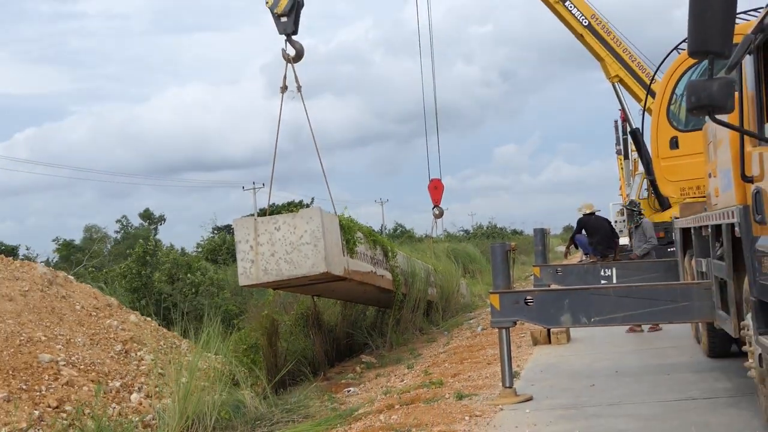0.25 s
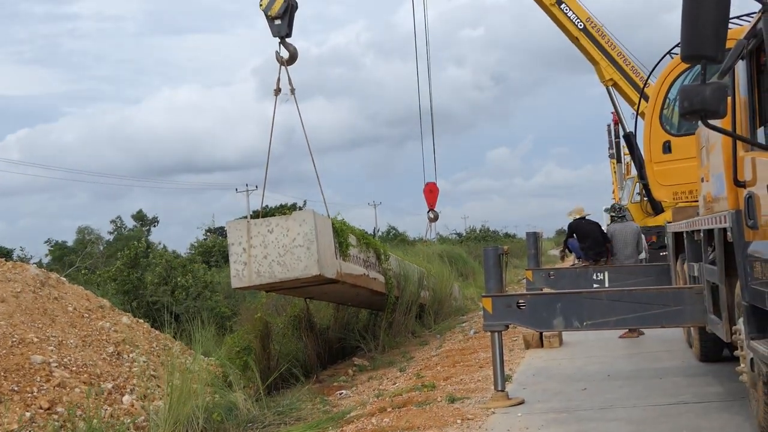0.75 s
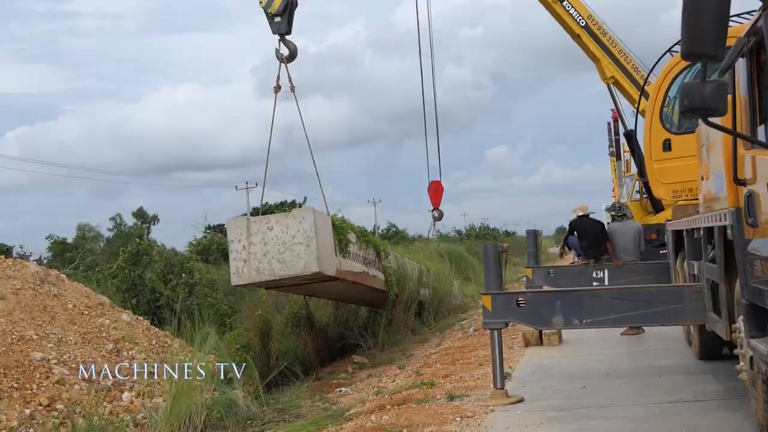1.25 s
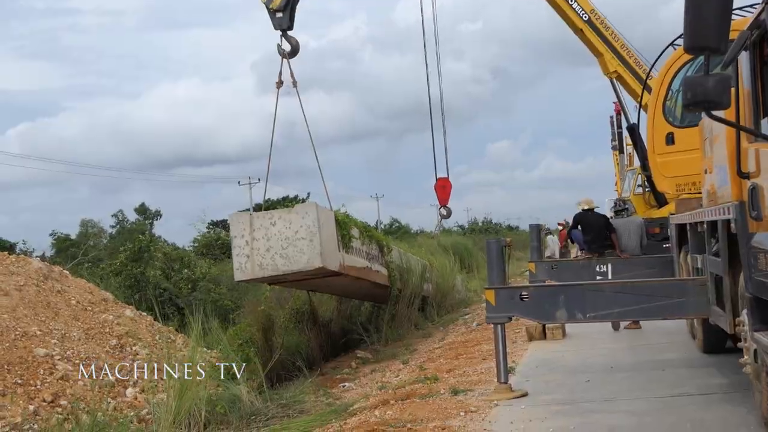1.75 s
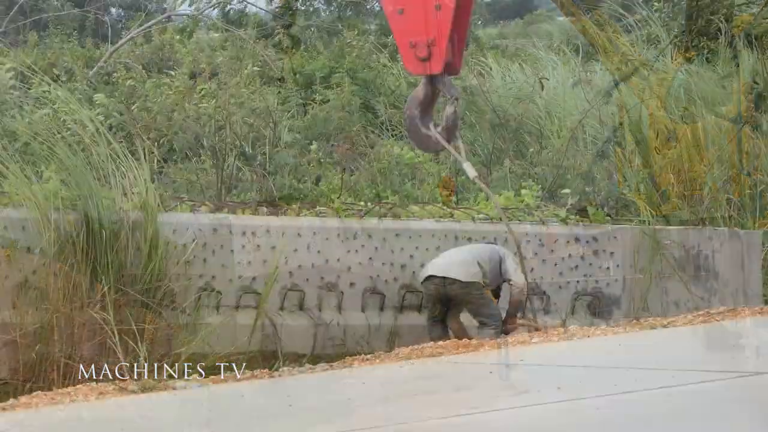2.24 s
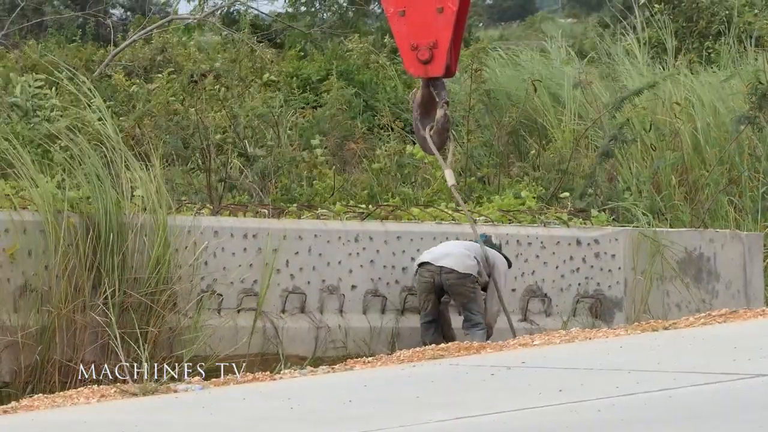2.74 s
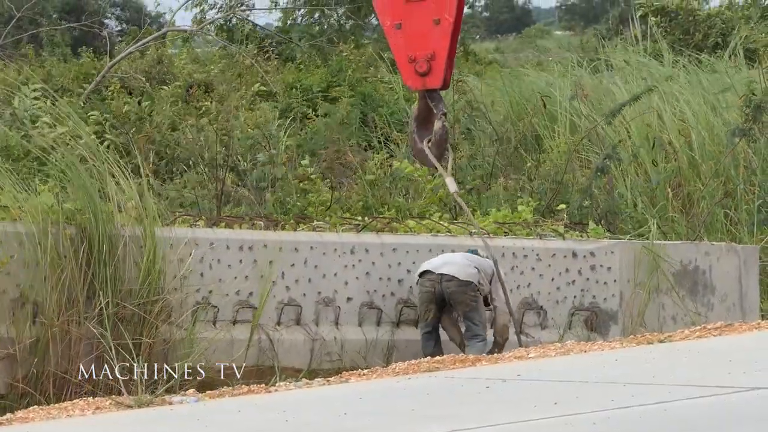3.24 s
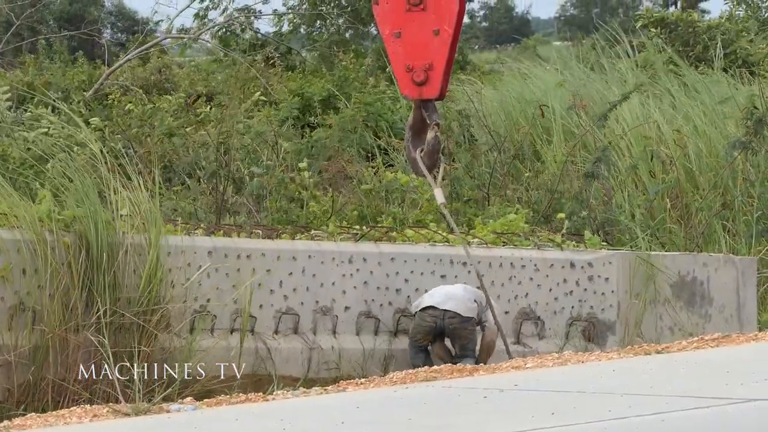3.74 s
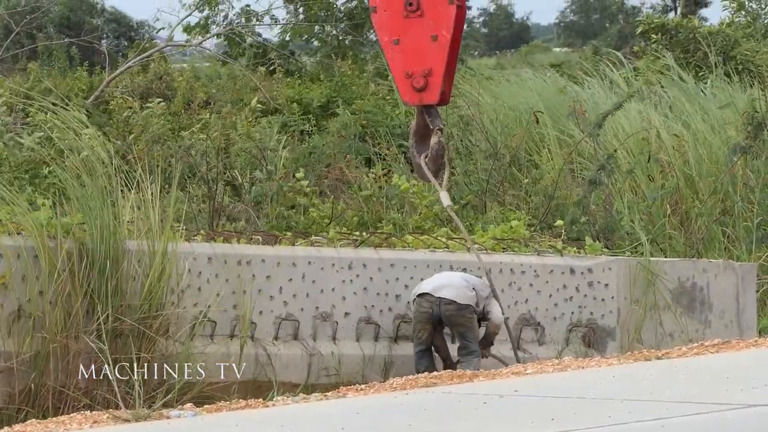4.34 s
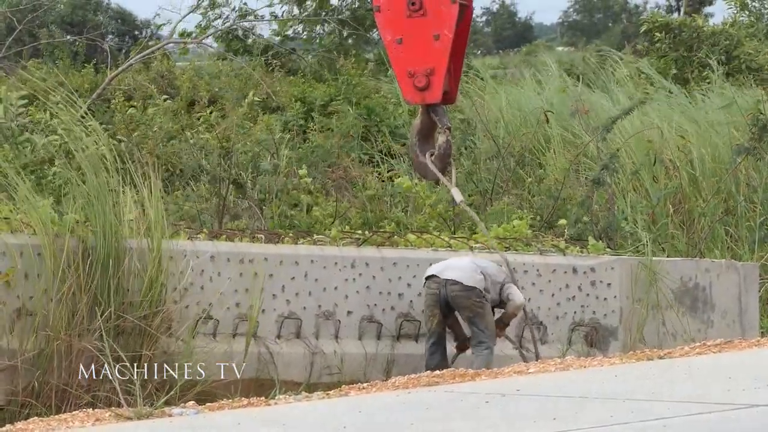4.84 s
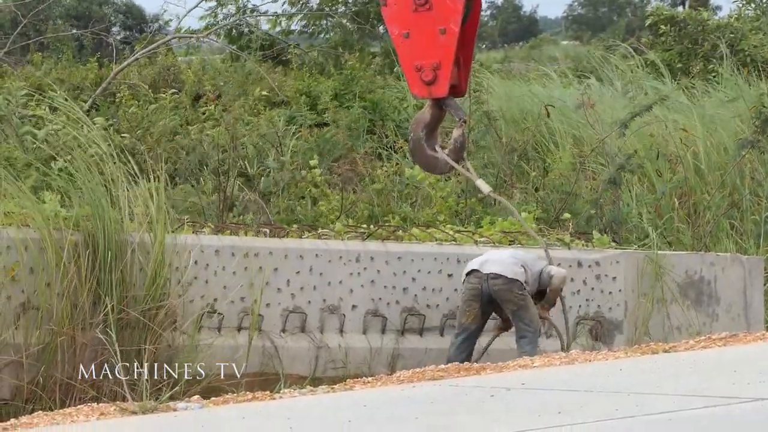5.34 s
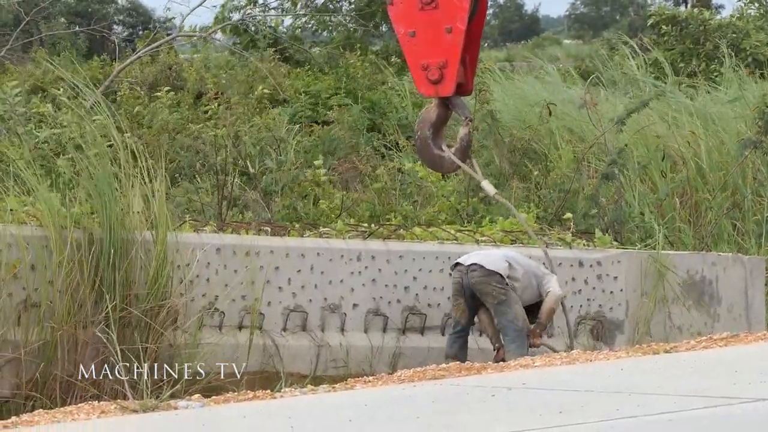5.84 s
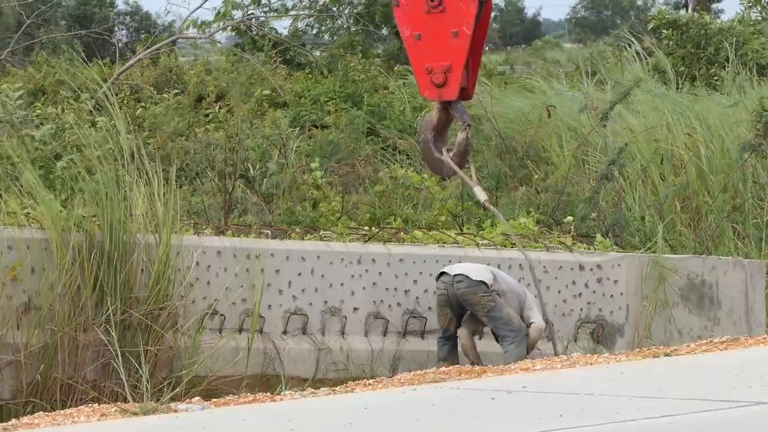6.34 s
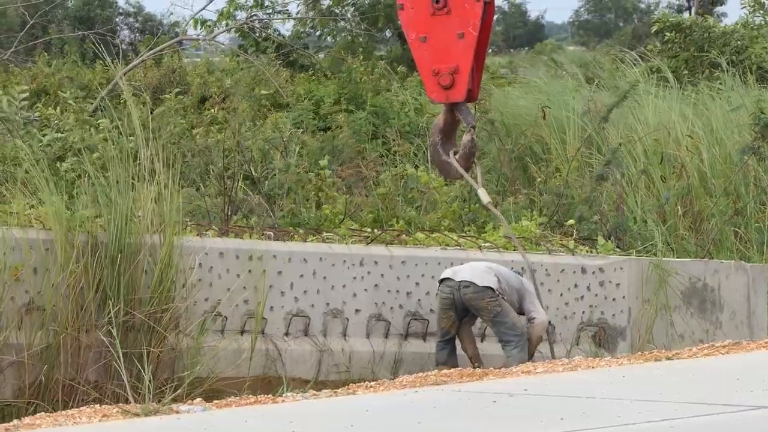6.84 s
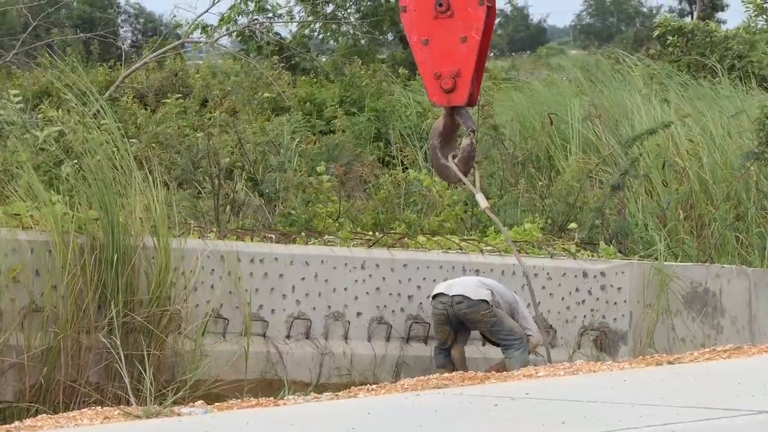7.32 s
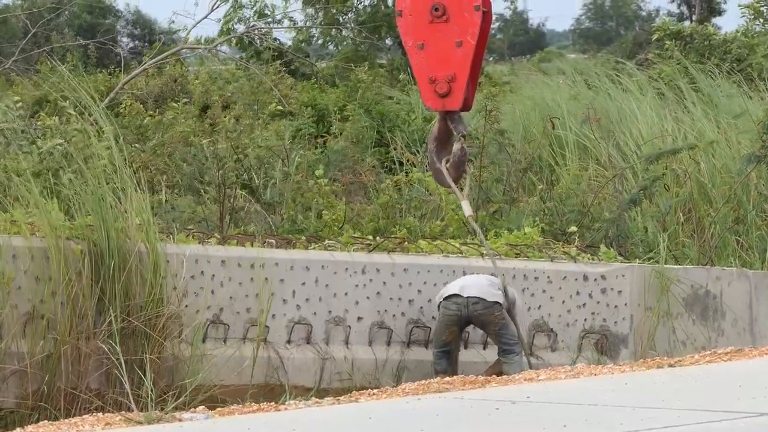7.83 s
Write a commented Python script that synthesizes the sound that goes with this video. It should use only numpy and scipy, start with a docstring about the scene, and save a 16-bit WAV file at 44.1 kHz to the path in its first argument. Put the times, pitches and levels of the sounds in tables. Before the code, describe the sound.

A loaded diesel crane engine roars and whines, cuts abruptly to brief silence, then a slower idling diesel knocks and hums while loose tackle clanks.

```python
"""A six-cylinder diesel crane truck roars at lifting speed, its hydraulic pump whining; after a short
silence, at a second place further off, an eight-cylinder idles with an uneven knock.
Engines are noise pulsed by firings, plus tones locked to the shaft; a hum of idling engines is wavering tones.
On the left loose tackle scrapes (bursts of noise) and clanks (ringing modes with cracks of noise).
Steel ticks and things bump as short ringing tones, and grit rustles as small bursts of grainy noise."""
import sys
import numpy as np
from scipy import signal
from scipy.fft import rfft, irfft, next_fast_len
from scipy.io import wavfile
from scipy.ndimage import map_coordinates

SR = 44100
rng = np.random.default_rng(int(sys.argv[2]) if len(sys.argv) > 2 else 0)


def master_out(mix):
    """Clip the mix to full scale and print it as 16-bit PCM to the path in sys.argv[1]."""
    frames = np.transpose(np.atleast_2d(mix))
    ceiling = np.clip(frames, -1, 1)
    pcm = np.round(ceiling * 32767).astype(np.int16)
    wavfile.write(sys.argv[1], SR, pcm)


N = 356328

LIFT_CYCLE_HZ, IDLE_CYCLE_HZ = 13.333, 4.11  # full four-stroke cycles a second
# knock of each lifting-engine cylinder, in firing order: level_db (relative)
LIFT_CYLINDERS = [3.5, -7, 3, -5.5, 0.5, 0.5]
# how far the second place's engines lean to the left: pitch_hz, left_minus_right_db
IDLE_LEAN = [(60, 0.5), (110, -0.5), (200, 0.0), (380, 2), (700, 3.5), (1290, 9), (2380, 7.5), (4400, 4),
             (8120, 2.5), (15000, -1.5)]
# how far the tackle leans to the left: pitch_hz, left_minus_right_db
TACKLE_LEAN = [(150, 4), (380, 0), (700, 14), (1300, 14), (2400, 14), (4400, 5), (9000, 3)]


def amp(db):
    """Decibels to gain."""
    return 10 ** (np.asarray(db) / 20)


def unit(x):
    """Scale to rms 1."""
    return x / np.sqrt(np.mean(x ** 2) + 1e-20)


def clock():
    """Time of every sample (s)."""
    return np.arange(N) / SR


def along(points, hz):
    """Read a curve of (Hz, value) points, spaced on a log pitch axis."""
    f, v = np.transpose(points)
    return np.interp(np.log(hz + 1), np.log(f + 1), v)


def wobble(rate):
    """A smooth curve through random points, rate of them a second."""
    points = rng.standard_normal(int(N * rate / SR) + 4)
    return map_coordinates(points, [clock() * rate])


def filtered(x, response):
    """Shape x by a gain for each frequency."""
    m = next_fast_len(N + 8192)
    gain = response(np.fft.rfftfreq(m, 1 / SR))
    return irfft(rfft(x, m) * gain, m)[..., :N]


def leaned(x, lean):
    """Share a sound between left and right, frequency by frequency."""
    def gains(hz):
        g = amp(np.outer([.5, -.5], along(lean, hz)))
        return g / g.mean(axis=0)
    return filtered(x, gains)


def placed(pair, spectrum, alike, lean):
    """Two unrelated signals become one coloured stereo source of rms 1."""
    def shape(hz):
        # the more alike left and right are, the less of the side signal is used
        turn = np.arccos(np.clip(along(alike, hz), -1, 1)) / 2
        return amp(along(spectrum, hz)) * [np.cos(turn), np.sin(turn)]
    mid, side = filtered(pair, shape)
    return unit(leaned(np.array([mid + side, mid - side]), lean))


def lifting_engine():
    """Six cylinders under load: a roaring body, dense injector clatter and the pump's whine."""
    # colour of the roar, then of the clatter: pitch_hz, level_db (relative)
    body_colour = [(25, -36.5), (70, -30.5), (110, -16.5), (155, -10), (300, -3.5), (490, 0.5), (600, -1),
                   (740, -0.5), (880, -9.5), (1000, -12.5), (1250, -19), (1800, -46.5), (4000, -95)]
    clatter_colour = [(710, -48), (1200, -16.5), (1410, -3.5), (1610, -0.5), (2320, -3), (3060, -11),
                      (4280, -5.5), (4870, -12), (6040, -8.5), (7100, -19), (8080, -13), (9000, -17.5),
                      (11900, -15.5), (13800, -18.5), (15800, -30.5)]
    # how alike left and right are: pitch_hz, coherence (0-1)
    alike = [(60, 0.56), (150, 0.86), (380, 0.9), (950, 0.9), (2380, 0.5), (5980, 0.7), (15000, 0.86)]
    # lean to the left: pitch_hz, left_minus_right_db
    lean = [(60, 2), (110, -2), (200, -0.5), (380, -0.5), (700, 0), (1290, -2.5), (2380, -6), (4400, -5.5),
            (8120, -3), (15000, 0)]
    cycles = crank(LIFT_CYCLE_HZ, start=0, drift=0.00031)
    beat = firings(cycles, LIFT_CYCLE_HZ, LIFT_CYLINDERS, rise=.0006, decay=0.0052, bed=1.0, scatter_db=2.2)
    body = beat * roar_swell() * rattle(cycles, LIFT_CYCLE_HZ, [(150, 0.13), (900, 0.17)])
    clatter_repeat = [(1500, 0.39), (4000, 0.56), (8000, 0.14), (12000, .04)]
    clatter = beat * rattle(cycles, LIFT_CYCLE_HZ, clatter_repeat)
    whine = tones(lifting_tones(), cycles / LIFT_CYCLE_HZ, waver_db=0.5, smear=0.17, rate=6.64)
    return (amp(-26.5) * placed(body, body_colour, alike, lean)
            + amp(-27.0) * placed(clatter, clatter_colour, alike, lean)
            + leaned(whine, lean))


def lifting_tones():
    """Pump, exhaust, gears and a belt-driven accessory follow the engine's speed: lines of (Hz, dB)."""
    # timing gears: rough pitch_hz, level_db; both are adjusted below
    meshes = [(1400, -49), (1599, -42.5), (1973, -47), (2239, -49), (2358, -44), (2880, -52), (3332, -49.5),
              (3682, -52.5), (3801, -56.5), (3957, -50.5), (4242, -47.5)]
    pump_hz = 36 * LIFT_CYCLE_HZ  # 36 pump strokes in each engine cycle
    firing_hz = len(LIFT_CYLINDERS) * LIFT_CYCLE_HZ
    pump = [(pump_hz, -35.5), (2 * pump_hz, -35)]
    exhaust = [(firing_hz, -61.5), (2 * firing_hz, -50.5)]
    # each gear tone locks to the nearest whole multiple of the cycle, 3 dB below its table level
    gears = [(round(hz / LIFT_CYCLE_HZ) * LIFT_CYCLE_HZ, db - 3) for hz, db in meshes]
    accessory = [(700, -40.5)]  # sings between the engine's own multiples
    return pump + exhaust + gears + accessory


def idling_engine():
    """Eight slow, unequal knocks a cycle over a rumbling body, with clacking covers and hissing belts."""
    # knock of each cylinder, in firing order: level_db (relative)
    cylinders = [2, 5.5, 2.5, 4.5, -9, -8, 1, 2.5]
    # colours of the rumble, knocking, clacks and hiss: pitch_hz, level_db (relative)
    body_colour = [(20, -38), (36, -13), (55, -16), (80, -5), (130, 0.5), (280, 2), (370, -2), (470, -7),
                   (700, -5.5), (920, -7), (1250, -13), (2000, -23), (6000, -61)]
    clatter_colour = [(100, -33), (500, -8), (900, -5.5), (1500, 1), (2000, -0.5), (2400, 0.5), (2900, -3),
                      (3300, -4), (3900, -9.5), (6000, -17.5), (11000, -23), (15800, -49)]
    clack_colour = [(300, -42), (1100, 2.5), (1900, -4), (2200, -12), (2350, 6.5), (2480, 0.5), (2740, 1),
                    (2870, 4), (3060, -8), (3400, -25), (6000, -36), (12000, -55)]
    hiss_colour = [(1500, -48), (3800, -8), (4330, 1), (4680, 0), (5750, 4.5), (6500, -0.5), (7000, -7),
                   (7550, -9.5), (8100, -14), (9500, -7), (11200, -17.5), (14200, -15), (15800, -35)]
    # how alike left and right are: pitch_hz, coherence (0-1)
    alike = [(60, 0.95), (150, 0.89), (380, 0.8), (950, 0.32), (2380, 0.5), (5980, 0.76), (15000, 0.022)]
    # three cover panels that ring with the clacks: pitch_hz, level_db (before the clack's own level)
    covers = [(900, -38.5), (2350, -41), (2870, -40.5)]
    # pulsing of the belt and gear hiss: rate_hz, depth_db
    hiss_pulses = [(16.45, .65), (61.6, .85), (74.8, .5), (136.4, .95)]
    # a loose guard buzzing with the pulses: pitch_hz, level_db (before pulsing)
    guard = [(5780, -54.5)]

    cycles = crank(IDLE_CYCLE_HZ, start=.221, drift=.0007)
    thud = firings(cycles, IDLE_CYCLE_HZ, cylinders, rise=0.0027, decay=0.012, bed=0.9, scatter_db=2.0)
    knock = firings(cycles, IDLE_CYCLE_HZ, cylinders, rise=0.0022, decay=0.016, bed=1.0, scatter_db=2.0)
    body = thud * roar_swell() * rattle(cycles, IDLE_CYCLE_HZ, [(150, 0.22), (900, 0.34)])
    clatter = knock * rattle(cycles, IDLE_CYCLE_HZ, [(1000, 0.1), (4000, 0.043)])

    panel_swells = clacking(cycles)
    ring = sum(swell * tones([panel], clock(), waver_db=0.5, smear=1.2, rate=170)
               for swell, panel in zip(panel_swells, covers))
    clack = panel_swells.mean(axis=0) * rng.standard_normal((2, N))

    # belts and gears pulse at their own turning rates; the guard's buzz pulses twice as deep in dB
    turning_db = sum(depth_db * np.sin(2 * np.pi * hz * clock()) for hz, depth_db in hiss_pulses)
    buzz = amp(2 * turning_db) * tones(guard, clock(), waver_db=1.5, smear=1.2, rate=390)
    hiss_level = np.hypot(knock, 1.6) * amp(turning_db + 0.61 * wobble(14))
    hiss = hiss_level * rng.standard_normal((2, N))
    return (amp(-28.0) * placed(body, body_colour, alike, IDLE_LEAN)
            + amp(-38.0) * placed(clatter, clatter_colour, alike, IDLE_LEAN)
            + amp(-45.0) * placed(clack, clack_colour, alike, IDLE_LEAN)
            + leaned(ring + buzz, IDLE_LEAN)
            + amp(-43.5) * placed(hiss, hiss_colour, alike, IDLE_LEAN))


def clacking(cycles):
    """The covers clack at the same places in every cycle and ring down: one envelope for each panel."""
    # clacks in one cycle: place (0-1 of the cycle), low_db, middle_db, high_db (relative, per panel)
    clacks = [(.995, 0, 0, 0), (.125, -16, -9, -6), (.22, -30, -11, -12), (.31, -14, -12, -16),
              (.387, -16, -1, -9), (.75, -5, -18, -12), (.89, -12, -12, -9)]
    rise_s, fall_s, scatter_db = .003, .0145, 1.2  # scatter is from cycle to cycle

    def burst(place, *panels_db):
        turn, part = np.divmod(cycles - place, 1)
        age = part / IDLE_CYCLE_HZ
        size = amp(scatter_db * rng.standard_normal(64)[turn.astype(int)])
        swell = 1 - np.exp(-(age / rise_s) ** 2)
        return np.outer(amp(panels_db), size * swell * np.exp(-age / fall_s))
    return sum(burst(*row) for row in clacks)


def crank(cycle_hz, start, drift):
    """Four-stroke cycles counted from start (s); the governor lets the speed drift a little."""
    return np.cumsum(1 + drift * wobble(4)) * cycle_hz / SR - start * cycle_hz


def firings(cycles, cycle_hz, cylinders, rise, decay, bed, scatter_db):
    """Each firing kicks the block at its cylinder's strength and dies onto a bed of running noise."""
    count = len(cylinders)
    stroke, part = np.divmod(cycles * count, 1)
    # shift by whole cycles so that no stroke number is negative
    stroke = (stroke - stroke.min() // count * count).astype(int)
    age = part / (cycle_hz * count)  # seconds since the latest firing
    chance = np.clip(rng.standard_normal(1024), -2, 2)[stroke]
    size = amp(np.array(cylinders)[stroke % count] + scatter_db * chance)
    return np.hypot(bed, size * np.exp(-age / decay) * (1 - np.exp(-age / rise)))


def rattle(cycles, cycle_hz, repeat):
    """The same parts collide in every cycle: a share of the noise repeats, the rest is new."""
    size = int(SR / cycle_hz)
    place = cycles % 1 * size
    same = np.array([map_coordinates(rng.standard_normal(size), [place], mode="grid-wrap")
                     for _ in range(2)])
    new = rng.standard_normal((2, N))

    def share(hz):
        return np.clip(along(repeat, hz), 0, 1)
    return (filtered(same, lambda hz: np.sqrt(share(hz)))
            + filtered(new, lambda hz: np.sqrt(1 - share(hz))))


def roar_swell():
    """An engine's roar swells and sinks at random, typically by 0.8 dB."""
    return amp(.8 * wobble(14))


def tones(lines, time, waver_db, smear, rate):
    """Steady (Hz, dB) lines, each wavering in level and phase on its way through the air."""
    def line(hz, db):
        level = np.sqrt(2) * amp(db + waver_db * wobble(rate))
        phase = 2 * np.pi * (hz * time + rng.random()) + smear * wobble(rate)
        return level * np.sin(phase)
    return sum(line(hz, db) for hz, db in lines)


def clanks():
    """The tackle tumbles, drops and bounces: short cracks over those damped modes each contact favours."""
    # contacts: start_s, ring_db, crack_db (both relative), favoured_hz
    contacts = [(7.3005, -18, -32, 800), (7.305, -25, -31, 950), (7.3108, -21, -26, 650),
                (7.3135, -22, -23, 1450), (7.3155, -21, -27, 750), (7.3185, -19.5, -19, 1600),
                (7.3205, -24, -25, 1450), (7.3255, -22, -27, 1450), (7.332, -18, -29, 800),
                (7.3895, -11, -17.5, 950), (7.3965, -25, -31, 2800), (7.404, -25, -38, 780),
                (7.432, -14, -41, 1150), (7.4415, -20, -45, 1100), (7.5215, -22, -46, 1000)]
    # the tackle's modes: pitch_hz, level_db (relative), t60_s (time to fall by 60 dB)
    tackle = [(645, -3, .11), (745, -3, .1), (840, -6, .05), (925, -5, .05), (1005, -2, .06),
              (1070, -4, .045), (1160, -4, .035), (1270, -6, .035), (1450, -9, .035), (1750, -13, .04),
              (2130, -13, .05), (2490, -15, .05), (2850, -8, .045), (3500, -8, .035)]
    # colour of the cracks: pitch_hz, level_db (relative)
    crack_colour = [(300, -28), (600, -12), (750, 5), (1050, -3.5), (1500, 2), (2100, -3), (2900, -1),
                    (3500, -4), (4100, -13), (5400, -13), (7500, -24), (10000, -20), (13000, -34),
                    (15000, -48)]
    t = clock()

    def favoured(centre):
        # a mode loses 8 dB for each octave away from the favoured pitch
        return [(hz, db - 8 * abs(np.log2(hz / centre)), t60) for hz, db, t60 in tackle]
    ring = sum(struck(favoured(centre), s, db, scatter_db=1.5, contact=.0007)
               for s, db, _, centre in contacts)
    # each crack falls by 60 dB in 0.019 s
    force = sum((t >= s) * amp(db - 60 * np.abs(t - s) / .019) for s, _, db, _ in contacts)
    noise = rng.standard_normal(N)
    crack = force * unit(filtered(noise, lambda hz: amp(along(crack_colour, hz))))
    return leaned(ring * amp(-3.5 + 1.5 * wobble(400)) + crack, TACKLE_LEAN)


def scrapes():
    """Loose tackle rubs: strokes of grainy friction noise."""
    # strokes: peak_s, level_db, rise_s, fall_s
    strokes = [(7.285, -26, .008, .008), (7.317, -18, 0.015, 0.015), (7.353, -27.5, 0.014, 0.012)]
    # colour: pitch_hz, level_db (relative)
    colour = [(40, -26), (150, 12), (400, 2), (700, 2), (1000, -4), (1200, -11), (1450, 5), (2300, -10),
              (3500, -5), (4100, -13), (5400, -5.5), (7500, -17.5), (10000, -15), (12500, -23),
              (15800, -46.5)]
    return rubbing(strokes, colour, TACKLE_LEAN, grain_db=2.2)


def rubbing(strokes, colour, lean, grain_db):
    """Strokes of friction: grains that swell to a peak and die away."""
    t = clock()
    force = sum(amp(db) * np.exp(-np.maximum((s - t) / rise, (t - s) / fall))
                for s, db, rise, fall in strokes)
    grains = amp(grain_db * wobble(900)) * rng.standard_normal((2, N))
    return force * placed(grains, colour, [(500, 0.93), (5000, 0.8)], lean)


def struck(modes, s, db, scatter_db, contact):
    """One blow at time s, of this contact time, starts all modes together; they soon drift out of step."""
    out, t = np.zeros(N + SR), np.arange(SR // 4) / SR

    def mode(hz, level, t60):
        start_db = db + level + scatter_db * rng.standard_normal()
        return amp(start_db - 60 * t / t60) * np.sin(2 * np.pi * hz * t)
    ring = sum(mode(*row) for row in modes)
    out[round(s * SR):][:len(t)] = ring * (1 - np.exp(-t / contact))
    return out[:N]


def scattered(x, wet_db, t60):
    """Ground and truck sides throw back a short, diffuse answer."""
    t = np.arange(SR // 4) / SR
    tail = rng.standard_normal((2, len(t))) * amp(-60 * t / t60) * (t > .002)
    tail = tail / np.linalg.norm(tail[0])
    return x + amp(wet_db) * signal.fftconvolve(x, tail, axes=1)[:, :N]


def bumps():
    """Loose things knock together, each with one quickly damped mode."""
    # dull bumps and small metal pings: start_s, level_db, pitch_hz, t60_s (time to fall by 60 dB)
    knocks = [(3.9432, -7, 310, 0.032), (4.88, -30, 4800, 0.037), (4.881, -35, 9750, .03),
              (7.2725, -22, 5900, .03), (7.318, -19, 5200, .025), (7.3183, -22, 9900, .025),
              (7.339, -16.5, 174, 0.077)]

    def knock(start, db, hz, t60):
        t = np.maximum(clock() - start, 0)
        return amp(db - 60 * t / t60) * (1 - np.exp(-t / 0.0018)) * np.sin(2 * np.pi * hz * t)
    return sum(knock(*row) for row in knocks)


def ticks():
    """Small steel parts touch and ring briefly."""
    # light touches of steel on steel: start_s, level_db (relative)
    touches = [(3.917, -47), (3.9255, -44), (3.9735, -41), (3.981, -37), (3.988, -39), (3.9965, -46),
               (4.139, -43), (4.146, -47), (4.2285, -42), (4.2325, -46)]
    # what they ring with: pitch_hz, level_db (relative), t60_s (time to fall by 60 dB)
    steel = [(5250, -2, .02), (5950, -3, .025), (7400, -5, .025), (7560, -2, .03), (7700, -7, .025),
             (8900, -9, .012), (9800, -4, .018), (10300, -7, .015), (12400, -12, .015)]
    ring = sum(struck(steel, s, db, scatter_db=2.5, contact=.0003) for s, db in touches)
    return leaned(ring, [(6000, 3.1)])


def grit():
    """Grit rustles: brief, coarse-grained bursts of bright friction noise."""
    # rustles: peak_s, level_db, fall_s
    rustles = [(3.926, -41, .008), (3.981, -33, 0.019), (4.141, -40, .01), (4.231, -40, .009),
               (4.884, -41, 0.017), (7.275, -34, .008)]
    # colour: pitch_hz, level_db (relative)
    colour = [(800, -50), (3800, -22), (4800, 0), (5800, 1), (7100, -2), (7550, -1), (8100, -6),
              (10500, -3.5), (12500, -17), (15500, -26)]
    strokes = [(s, db, 0.4 * fall, fall) for s, db, fall in rustles]  # the rise is a share of the fall
    return rubbing(strokes, colour, [(6000, 2.8)], grain_db=5.0)


def site_hum():
    """Low wavering tones of idling engines beat against each other under thin gear tones."""
    # further low drones: pitch_hz, level_db
    drones = [(37.0, -59), (70.0, -49), (74.0, -52), (90.2, -51), (129.2, -46.5), (164.2, -43.5),
              (198.5, -49), (233.5, -48.5), (279.9, -47.5), (334.4, -45.5)]
    # gear tones of the distant cranes: pitch_hz, level_db
    gear_lines = [(444.1, -52), (480.2, -48.5), (484.3, -50), (530.3, -53), (538.3, -53), (736.3, -48.5)]
    hum = tones([*hum_orders(count=11), *drones], clock(), waver_db=3.0, smear=0.57, rate=4)
    gears = tones(gear_lines, clock(), waver_db=2.6, smear=0.45, rate=3.06)
    return leaned(hum + gears, IDLE_LEAN)


def hum_orders(count):
    """An idling engine's hum: multiples of its firing rate as the silencer passes them (Hz, dB)."""
    firing_hz, silencer_hz, peak_db = 24.64, 96, -45.5
    hz = firing_hz * np.arange(1, count + 1)
    octaves = np.log2(hz / silencer_hz)
    # falls 24 dB per octave below the silencer's peak and 2.5 above it
    return list(zip(hz, peak_db - np.maximum(-24 * octaves, 2.5 * octaves)))


def scene():
    """The first place stops dead; after a quarter second the second begins."""
    lift_end, idle_start = 2.124, 2.376  # seconds
    t = clock()
    fade_s = [lift_end - .001, lift_end + .001, lift_end + .025, lift_end + .035]
    leaving = amp(-np.interp(t, fade_s, [0, 22, 52, 140]))
    arriving = np.clip((t - idle_start) * 1000, 0, 1)  # fades in over a millisecond
    tackle = scrapes() + scattered(clanks(), wet_db=-15, t60=0.22)
    steel = scattered(ticks(), wet_db=2.5, t60=0.061)
    second_place = idling_engine() + tackle + bumps() + steel + grit() + site_hum()
    return leaving * lifting_engine() + arriving * second_place


def record(dry):
    """Nothing passes above the band limit of about 15800 Hz."""
    return filtered(dry, lambda hz: np.clip((15800 - hz) / 200 + .5, 0, 1))


dry = scene()
out = record(dry)
master_out(out)
```